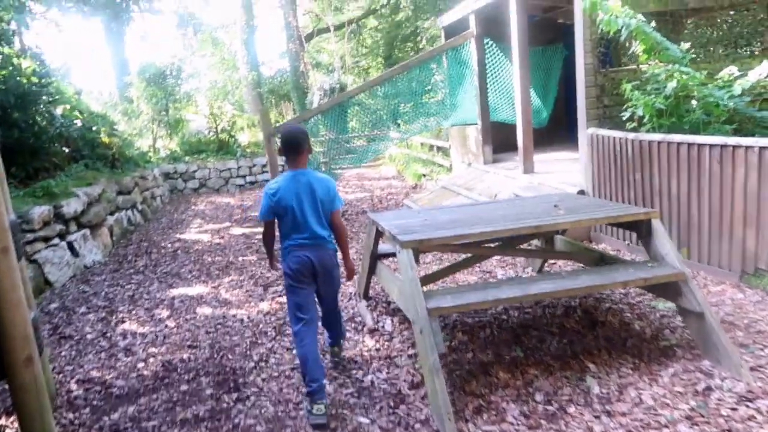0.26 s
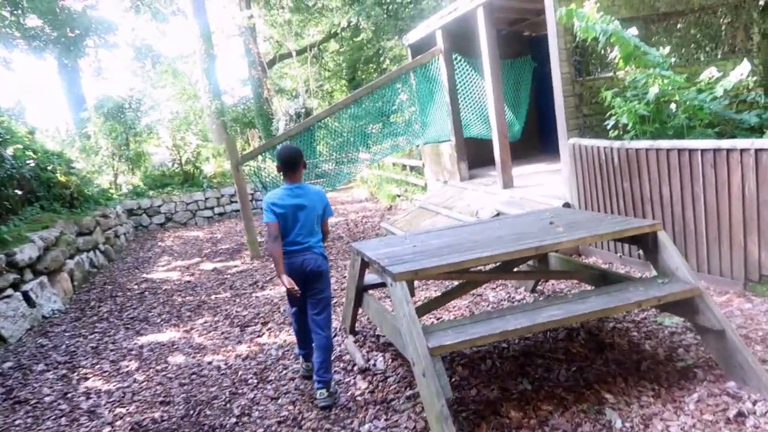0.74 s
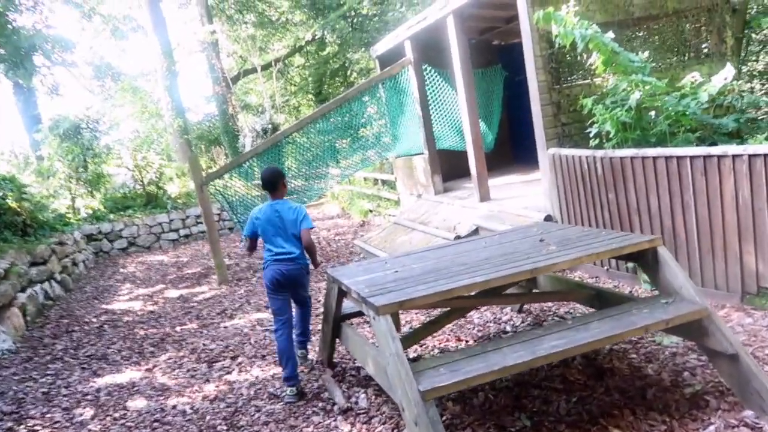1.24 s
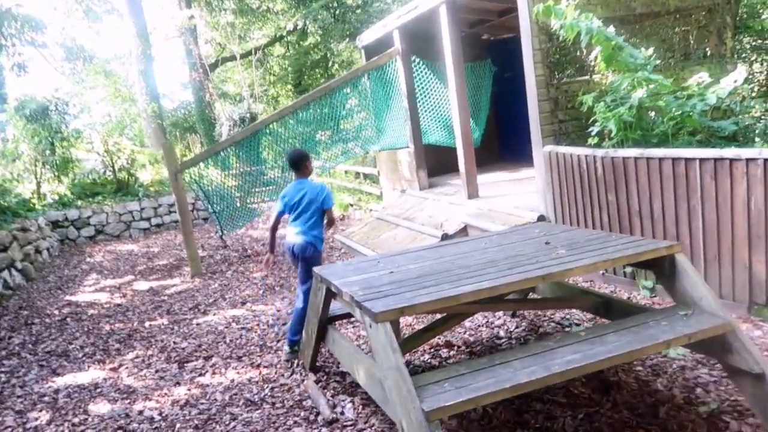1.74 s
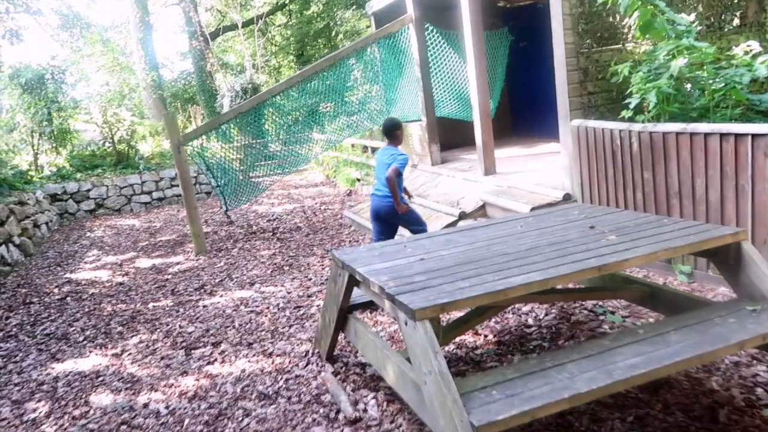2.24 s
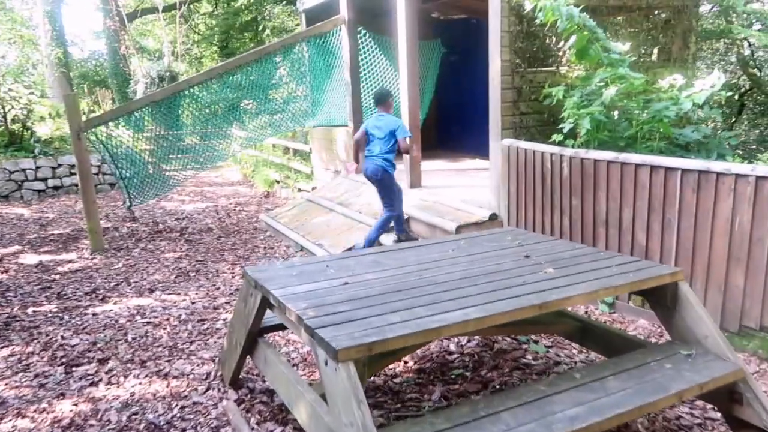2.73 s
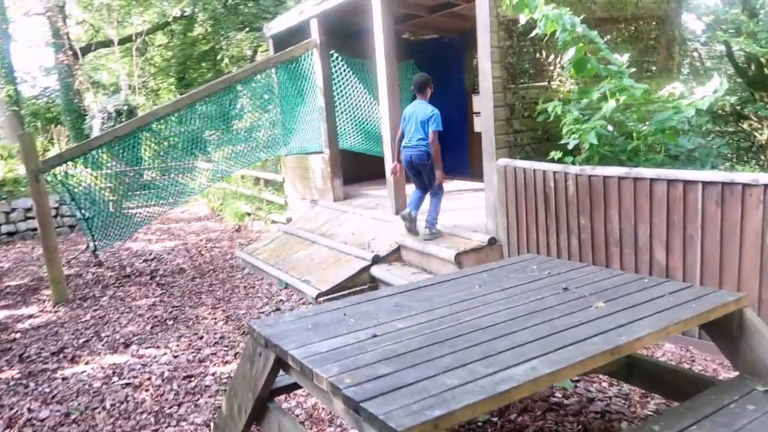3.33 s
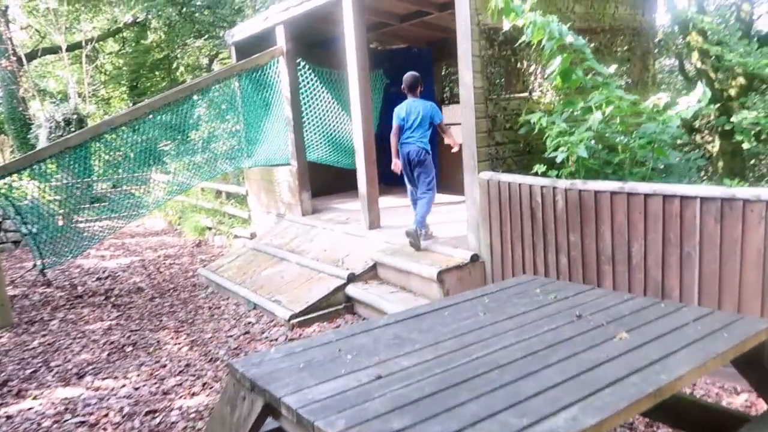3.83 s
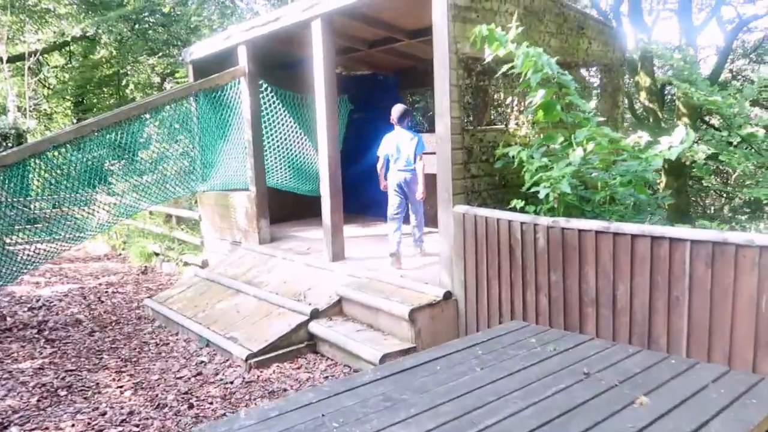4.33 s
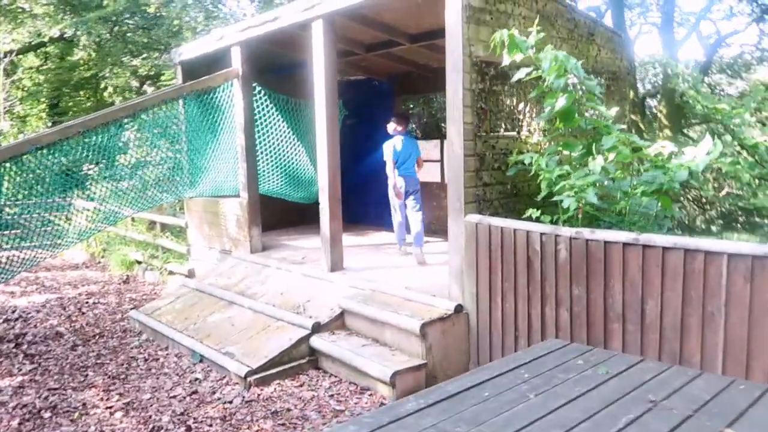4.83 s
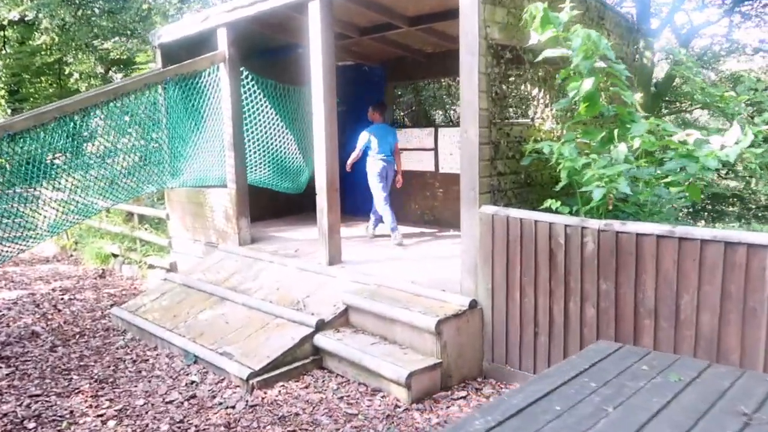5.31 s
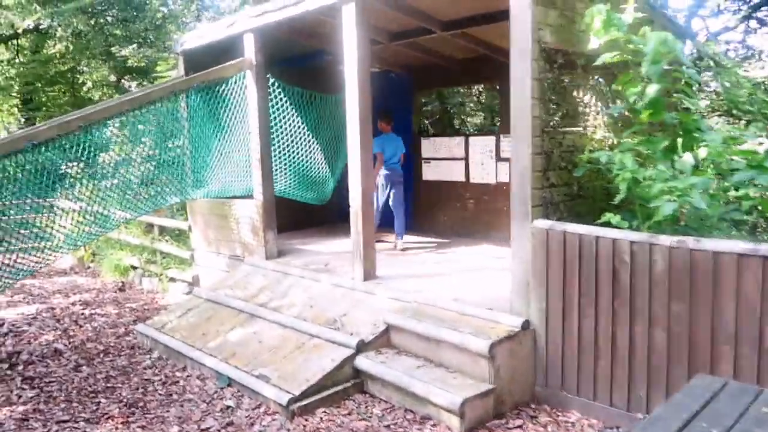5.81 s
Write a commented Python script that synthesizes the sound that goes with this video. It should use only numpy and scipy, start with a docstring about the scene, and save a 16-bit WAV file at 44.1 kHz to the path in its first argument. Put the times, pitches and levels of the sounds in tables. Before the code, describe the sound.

Crackly steps on bark and woody snaps, a loud booming knock halfway, a drier second clack, then gritty deck steps in light wind.

```python
"""A child's steps on bark chippings and then a gritty wooden deck: swells of tiny cracks, chip clicks, snaps.
Close on the hand-held camera, two sharp knocks ring casing and body modes; the first booms and overloads.
Faint thin treble ticks, like small glitches of the camera or microphone, are short noise bursts. Light wind on
the two ports rumbles as gusted noise and puffs as low pressure pulses, one of which is a knock's low push.
Behind it all, trees rush steadily: coloured noise with leaf hiss."""
import sys
import numpy as np
from scipy import signal
from scipy.fft import rfft, irfft, next_fast_len
from scipy.io import wavfile
from scipy.ndimage import uniform_filter1d, map_coordinates

SR = 44100
rng = np.random.default_rng(int(sys.argv[2]) if len(sys.argv) > 2 else 0)


def store_wav(level_fs):
    """Save 16-bit WAV to argv[1]."""
    pcm = np.round(np.clip(np.atleast_2d(level_fs), -1, 1) * 32767)
    wavfile.write(sys.argv[1], SR, pcm.T.astype(np.int16))


N = 267334

# In all tables the dB values are relative: each source adds its own trim or scales the colour.
# Footfalls and scuffs on bark, then deck: start_s, level_db, swell_length_s, centre_hz
FOOTFALLS = [(0.172, -34.5, 0.16, 780), (0.446, -31.5, 0.054, 760), (0.496, -28, 0.024, 895),
             (0.546, -36, 0.014, 1400), (0.963, -36.5, 0.079, 650), (1.029, -30.5, 0.038, 1050),
             (1.56, -32, 0.12, 537), (1.536, -41.5, 0.11, 5500), (1.602, -48, 0.073, 1700),
             (1.784, -35, 0.03, 1590), (1.789, -44, 0.035, 6600), (2.073, -26, 0.031, 780),
             (2.354, -39, 0.027, 700), (2.385, -32, 0.098, 664), (2.492, -23, 0.031, 720),
             (2.878, -30, 0.069, 1060), (3.04, -34, 0.05, 950), (3.149, -27.5, 0.032, 785),
             (4.125, -34, 0.051, 910), (4.375, -33.5, 0.06, 700), (4.721, -38, 0.098, 700),
             (4.776, -36, 0.11, 700), (4.89, -31.5, 0.085, 920), (5.191, -33.5, 0.082, 860),
             (5.465, -34, 0.063, 760), (5.552, -29.5, 0.014, 750), (5.644, -40, 0.045, 1100),
             (6.03, -30, 0.027, 1000)]
# Colour of a step centred on 1 kHz, moved to each step's centre: frequency_hz, density_db_per_hz
CRUNCH_COLOUR = [(150, -15), (450, 8.5), (1000, 10), (1700, 2), (2500, -12), (5000, -13), (12000, -45)]
# Single chips and boards that snap or clack: start_s, level_db, pitch_hz, length_cycles
WOOD_SNAPS = [(0.182, -12.5, 790, 5.3), (0.549, -16, 1600, 5), (0.604, -3.5, 490, 2.4),
              (0.969, -12.5, 427, 6), (1.007, -17, 900, 9), (1.0375, -8, 526, 6), (1.038, -9, 1540, 6),
              (1.0395, -17, 950, 10), (1.102, -17, 920, 7), (1.546, -15, 1340, 6.9), (1.546, -19, 6800, 9),
              (1.787, -19.5, 2620, 9), (1.787, -16, 420, 5), (1.9, -16, 2800, 4), (2.08, -14, 660, 5),
              (2.356, -19, 900, 6.2), (2.437, -19, 900, 7), (2.495, -19, 1100, 5), (2.519, -15, 950, 5.2),
              (2.897, -10, 840, 4.5), (2.936, -16, 950, 5.4), (3.111, -13, 830, 6.9), (3.132, -19, 1190, 5),
              (3.16, -14.5, 940, 7), (3.9328, -4.5, 1000, 5.3), (4.046, -15, 2160, 5.7),
              (4.374, -17, 700, 7), (4.899, -18, 790, 6.7), (4.959, -14, 1150, 6), (4.985, -19, 2500, 8.3),
              (5.467, -14.5, 1900, 6), (5.467, -14.5, 800, 6.7), (5.497, -9, 603, 9), (5.551, -16, 1100, 6),
              (5.65, -19, 1080, 6.4), (6.039, -14, 1280, 11), (6.043, -15, 705, 6.8)]
# Knocks and rebounds on the camera; the contact damps the click:
# start_s, click_db, favoured_pitch_hz, contact_t60_s, thud_db, rattle_db
CAMERA_KNOCKS = [(3.3021, 0.5, 3700, 0.055, -33, -31), (3.3049, 5.5, 950, 0.26, -1.5, -31),
                 (3.318, -25, 1200, 0.01, -12, -37), (3.3321, -13, 2000, 0.01, -16.5, -33),
                 (3.346, -28, 700, 0.01, -17, -40), (3.8752, 1, 2900, 0.0087, -46, -24),
                 (3.8762, -4.5, 650, 0.0076, -44, -21), (3.878, -9, 3400, 0.01, -25, -18.5),
                 (3.8996, -11, 3100, 0.012, -23, -27.5), (3.91, -24, 900, 0.008, -21, -29),
                 (3.9233, -27, 2900, 0.03, -29, -31)]
# Modes of the hard casing, which clicks at every contact: pitch_hz, level_db, t60_s
CASING_MODES = [(565, -1, 0.009), (820, 0.5, 0.036), (1150, -3.5, 0.028), (1370, -2, 0.02),
                (1890, -16, 0.011), (2680, -3.5, 0.017), (3020, -13, 0.0081), (3700, -2.5, 0.0069),
                (4400, -17, 0.0098), (4950, -38, 0.0074), (6200, -12, 0.0087)]
# Modes of the camera body and the hand that holds it: pitch_hz, level_db, t60_s
BODY_MODES = [(76, -4, 0.22), (122.6, -1.5, 0.19), (195, -4, 0.15), (249, -7.5, 0.21), (405, -17, 0.13),
              (500, -25, 0.15), (530, -29, 0.15), (663, -30, 0.12), (810, -34, 0.11), (1150, -39, 0.089),
              (1470, -31, 0.13), (2000, -32, 0.13)]
# Colour of dry crackle, in rattle and splintering: frequency_hz, density_db_per_hz
CRACKLE_COLOUR = [(60, -20), (300, 15.5), (1000, 4), (1800, 5), (2600, 6), (3350, 3), (4000, -2),
                  (4700, -5), (8000, -31), (12000, -41)]
# Faint thin treble ticks, like small glitches of the camera or microphone: start_s, level_db
THIN_TICKS = [(1.6085, -25), (2.310, -22), (2.4935, -19), (2.994, -24), (3.3115, -17), (3.378, -26),
              (3.878, -21), (4.38, -25), (4.563, -25), (5.131, -30), (5.397, -29), (5.447, -30),
              (5.514, -26)]
# Single low pressure pulses: wind puffs, and at 3.924 s the low push of the second knock:
# centre_s, level_db, pitch_hz, left_minus_right_db
PRESSURE_PULSES = [(0.212, -15, 85, 2), (0.226, -14.5, 95, 7), (0.903, -9, 151, -4), (0.933, -14, 75, 2),
                   (0.998, -0.5, 102, -3), (1.215, -11.5, 178, 5), (1.224, -2.5, 104, 3),
                   (1.402, -14, 191, 6), (1.414, -10.5, 100, 7), (1.514, -14, 96, -3), (1.538, -3, 68.6, 0),
                   (1.561, -11, 141, 18), (1.584, -6, 85.5, 12), (2.312, -22, 85, -2), (2.476, -15, 89, 0),
                   (2.545, -8, 135, 4), (2.892, -14.5, 123, 1), (2.937, -13, 100, 1.5), (2.996, -16, 85, 0),
                   (3.681, -14.5, 65.6, 1), (3.924, -21, 58, -7), (4.384, -14, 104, -5),
                   (4.678, -13, 85, 5), (4.936, -9.5, 92, 3), (4.98, -10, 92, -2.5), (4.991, -13, 102, -3),
                   (5.042, -12, 65.6, 0), (5.059, -9, 76, 2), (5.431, 0.5, 104, 2),
                   (5.481, -11.5, 90, -0.5), (5.524, -10.5, 109, -2)]
# Gusts on the microphone: start_s, length_s, buffet_db
WIND_GUSTS = [(0, 0.027, -34), (0.166, 0.055, -27.5), (0.62, 0.36, -34), (0.9, 0.17, -24.5),
              (1.353, 0.13, -26.5), (1.528, 0.084, -19.5), (1.664, 0.029, -26.5), (2.317, 0.027, -25),
              (2.478, 0.11, -21.5), (2.62, 0.43, -27.5), (2.863, 0.15, -26), (3.787, 0.027, -36),
              (3.933, 0.085, -36.5), (4.54, 0.037, -31), (4.66, 0.049, -28), (4.835, 0.094, -27),
              (4.975, 0.081, -22), (5.287, 0.077, -24.5), (5.447, 0.11, -23)]
# Colour of wind on the ports: frequency_hz, density_db_per_hz
RUMBLE_COLOUR = [(12, -16), (25, -4.5), (45, 6), (75, 3), (115, -3.5), (170, -9.5), (260, -20.5),
                 (450, -30), (1200, -65)]
# Slow level curves of the trees: time_s, low_rush_db, leaf_hiss_db
TREE_LEVELS = [(0.0, -30, -40), (2.45, -31, -40), (3.24, -30.5, -41), (3.43, -31.5, -42),
               (4.42, -33, -42.5), (4.84, -31.5, -41.5), (6.06, -31.5, -41.5)]
# Colour of the trees: frequency_hz, density_db_per_hz
RUSH_COLOUR = [(35, -50), (60, -31), (108, -2.5), (168, -5), (244, -2.5), (274, -4), (371, -5.5),
               (408, -8.5), (566, -9.5), (732, -11), (968, -13.5), (1440, -18), (3340, -28.5), (10000, -46),
               (16000, -74.5)]
# Stereo width at the close ports: frequency_hz, side_gain_db
PORT_WIDTH = [(60, -56), (200, -23), (330, -11.5), (600, -15), (1300, -14), (2400, -11.5), (4400, -3),
              (8100, 1), (12000, 12.5), (15000, 18)]

GUST_RISE_S, GUST_FALL_S = 0.024, 0.025  # time constants of every gust
SAG_DB_PER_S = 6  # a gust eases while it lasts
CALM_DB, CALM_SWING_DB = -40.5, 4.5  # the restless air between gusts, before the wind trim
STIFFEN, RELAX_S = 0.42, 0.018  # a blow tightens the grip: fractional rise of the lowest mode, time to relax
TOP_HZ = 16100  # band limit of the input


def amp(db):
    """Decibels to gain."""
    return 10 ** (np.asarray(db) / 20)


def unit(x):
    """Scale to rms 1."""
    return x / np.sqrt(np.mean(x ** 2) + 1e-20)


def along(points, hz):
    """Interpolate (Hz, value) points on a log frequency axis."""
    f, v = np.transpose(points)
    return np.interp(np.log(hz + 1), np.log(f + 1), v)


def curves(rows):
    """One value per sample for each column after the time."""
    s, *cols = np.transpose(rows)
    return [np.interp(np.arange(N) / SR, s, c) for c in cols]


def wobble(rate):
    """A smooth random curve, rate knots a second."""
    knots = rng.standard_normal(int(N * rate / SR) + 4)
    return map_coordinates(knots, [np.arange(N) * rate / SR])


def filtered(x, response):
    """Filter x by a real or complex response of frequency."""
    n = x.shape[-1]
    m = next_fast_len(n + SR // 4)
    return irfft(rfft(x, m) * response(np.fft.rfftfreq(m, 1 / SR)), m)[..., :n]


def resonance(f, hz, width):
    """Causal response of one resonance, with its width in Hz."""
    return 1j * f * width / (hz * hz - f * f + 1j * f * width)


def noise(spectrum, size):
    """Two unrelated noises of the given colour, scaled together to rms 1."""
    return unit(filtered(rng.standard_normal((2, size)), lambda f: amp(along(spectrum, f))))


def ring(t, hz, t60):
    """One damped mode, a sine that falls 60 dB in t60 seconds."""
    return np.sin(2 * np.pi * hz * t) * amp(-60 * t / t60)


def cracks(per_s, size, spread_db=4):
    """Two trains of tiny random cracks, a few much larger than the rest, rms 1."""
    signs = rng.choice([-1, 1], (2, size))
    present = rng.random((2, size)) < per_s / SR
    return unit(present * signs * amp(spread_db * rng.standard_normal((2, size))))


def patchy(x, depth_db):
    """Let each band swell and fade on its own, in patches of a few hundred Hz and a tenth of a second."""
    spectra = signal.stft(x, nperseg=512)[2]
    field = rng.standard_normal(spectra.shape[1:])
    field = uniform_filter1d(field, size=3, axis=0)  # across frequency
    field = uniform_filter1d(field, size=16, axis=1)  # across time
    return unit(signal.istft(spectra * amp(depth_db * unit(field)))[1][:, :N])


def add(track, s, sound):
    """Mix a sound in at time s."""
    part = track[..., max(round(s * SR), 0):][..., :sound.shape[-1]]
    part += sound[..., :part.shape[-1]]


def ports(pair, side_db=0):
    """Mid and side to left and right: the close ports agree in the bass and part in the treble."""
    mid = pair[0]
    side = filtered(pair[1], lambda f: amp(along(PORT_WIDTH, f) + side_db))
    return np.array([mid + side, mid - side])


def steps(level_db=1.8, grains_per_s=650, scuff=0.46, heel=0.66):
    """A sole presses many chips at once: a swell of tiny cracks in a broad woody band."""
    out, t = np.zeros((2, N)), np.arange(SR // 3) / SR
    for s, db, length, hz in FOOTFALLS:
        grit = cracks(grains_per_s, len(t), spread_db=3.5) + scuff * rng.standard_normal((2, len(t)))
        crunch = unit(filtered(grit, lambda f: amp(along(CRUNCH_COLOUR, f * 1000 / hz))))
        load = heel + 3 * t / length  # the heel lands with part of the load at once
        add(out, s, amp(db + level_db) * crunch * load * np.exp(1 - load))
    return ports(out, side_db=-16)


def chips(level_db=1.0, count=10, scatter_s=0.035, spread_db=3, pitch_spread=0.31, cycles=6, pitch=1.42):
    """Every footfall flicks a few loose chips that click after it, each with its own size and pitch."""
    out, t = np.zeros((2, N)), np.arange(SR // 40) / SR
    for s, db, length, hz in FOOTFALLS:
        for when, size, tone, place in rng.standard_normal((count, 4)):
            f = min(pitch * hz * np.exp(pitch_spread * tone), SR / 4)
            chip = ring(t, f, cycles / f) * np.array([[1], [place / 4]])  # mid, side
            delay = abs(when) * (length / 2 + scatter_s)
            chip_db = db + level_db + spread_db * np.clip(size, -2, 1)
            add(out, s + delay, amp(chip_db) * chip)
    return ports(out)


def snaps(level_db=-3, splinter=0.18, soften=3, swell=0.086):
    """A short woody ring that swells and dies, with a splintering edge; little reaches far above its pitch."""
    out, t = np.zeros((2, N)), np.arange(SR // 10) / SR
    for s, db, hz, cycles in WOOD_SNAPS:
        length = cycles / hz
        u = t / (swell * length)
        wood = np.sin(2 * np.pi * hz * t) * u * np.exp(1 - u)
        edge = splinter * noise(CRACKLE_COLOUR, len(t)) * amp(-60 * t / length)
        snap = filtered(wood + edge, lambda f: 1 / (1 + 1j * f / (soften * hz)) ** 2)
        add(out, s, amp(db + level_db) * snap)
    return ports(out, side_db=-26)


def knocks(focus=0.73, rattle_t60=0.18, rattle_per_s=1100, clump_db=5.0, boom_db=4.0,
           rough_db=-11.0, rough_t60=0.33, soften_hz=7500):
    """The casing clicks, the body booms and loose parts rattle in bursts; both ports feel the boom alike."""
    clicks, boom, t = np.zeros((2, N)), np.zeros(N), np.arange(SR // 2) / SR
    gripped = t + STIFFEN * RELAX_S * (1 - np.exp(-t / RELAX_S))  # time runs fast while the grip is stiff
    for s, click_db, hz, contact_t60, thud_db, rattle_db in CAMERA_KNOCKS:
        # click and rattle are strongest near the pitch of the part that was hit
        shell = sum(amp(db) * abs(resonance(f, hz, focus * hz)) * ring(t, f, t60)
                    for f, db, t60 in CASING_MODES)
        click = shell * amp(click_db - 60 * t / contact_t60) * amp([[0], [-9]])  # mid, side
        bursts = cracks(rattle_per_s, len(t)) * amp(clump_db * wobble(204)[:len(t)])
        rattle = unit(filtered(bursts, lambda f: amp(along(CRACKLE_COLOUR, f)) * resonance(f, hz, 3.0 * hz)))
        add(clicks, s, click + rattle * amp(rattle_db - 60 * t / rattle_t60))
        # each blow excites the body modes a little differently; only the lowest feels the grip
        modes = sum(amp(db + rng.normal(0, 1)) * ring(t if k else gripped, f, t60)
                    for k, (f, db, t60) in enumerate(BODY_MODES))
        shudder = unit(filtered(rng.standard_normal(len(t)), lambda f: resonance(f, 193, 580) ** 2))
        shudder = shudder * amp(rough_db - 60 * t / rough_t60)
        add(boom, s, amp(thud_db + boom_db) * (modes + shudder))
    boom = filtered(boom, lambda f: (1j * f / (30 + 1j * f)) ** 2)  # a light body carries no deep push
    both = ports(clicks, side_db=-6.0) + boom
    return filtered(both, lambda f: 1 / (1 + 1j * f / soften_hz) ** 2)


def ticks(level_db=1, low_hz=2500, high_hz=11000, t60=0.0027):
    """Faint thin treble ticks, like small glitches: dry, decaying noise bursts, alike on both ports."""
    out, t = np.zeros(N), np.arange(SR // 100) / SR
    for s, db in THIN_TICKS:
        burst = rng.standard_normal(len(t)) * amp(-60 * t / t60)
        tick = filtered(burst, lambda f: (1j * f / (low_hz + 1j * f)) ** 2)
        add(out, s, amp(db + level_db) * tick / np.abs(tick).max())
    return filtered(out, lambda f: 1 / (1 + 1j * f / high_hz))


def pressure_pulses(level_db=-1, skew=0.23, churn=0.065, suck=0.36):
    """Each pulse is a push and a suck after it, offset in time between the ports, with churning noise on each."""
    out, t = np.zeros((2, N)), np.arange(SR // 10) / SR - .05  # time around the pulse's centre
    sides = np.array([[1], [-1]])  # left, right
    for s, db, hz, pan in PRESSURE_PULSES:
        u = np.pi * hz * t + sides * skew * np.tanh(pan / 2)
        swirl = filtered(rng.standard_normal((2, len(t))), lambda f: resonance(f, 271, 98) ** 2)
        push = (1 - 2 * u * u - 2 * suck * u) * np.exp(-u * u)
        pulse = push + churn * unit(swirl) * np.exp(-np.abs(u) / 2) * 2
        add(out, s + t[0], amp(db + level_db + sides * pan / 2) * pulse)
    return out


def gusts():
    """Strength of the wind: every gust swells, sags and dies away alike, over restless calm air."""
    t = np.arange(N) / SR
    power = amp(CALM_DB + CALM_SWING_DB * wobble(10)) ** 2
    for s, length, db in WIND_GUSTS:
        edges = np.exp(np.minimum(t - s, 0) / GUST_RISE_S - np.maximum(t - s - length, 0) / GUST_FALL_S)
        sagging_db = db - SAG_DB_PER_S * np.clip(t - s, 0, length)
        power = power + (amp(sagging_db) * edges) ** 2
    return np.sqrt(power)


def wind(level_db=1.5, gust_db=-25, calm_side_db=-16, parting=0.68, lump_db=3.5):
    """Turbulence on the ports: the stronger the gust, the less the two agree on its small eddies."""
    buffet_db = 20 * np.log10(gusts())
    mid, side = noise(RUMBLE_COLOUR, N)
    # even out the swings over 50 ms, so that gusts and lumps set the size
    mid = mid / np.sqrt(np.abs(uniform_filter1d(mid ** 2, size=2200)) + 0.035)
    side = filtered(side, lambda f: resonance(f, 175, 220) ** 2)
    side = unit(side) * amp(np.clip(-9.0 + parting * (buffet_db - gust_db), calm_side_db, 0))
    strength = amp(buffet_db + level_db + lump_db * wobble(25.04))
    return strength * np.array([mid + side, mid - side])


def trees(low_db=0.08, hiss_db=1, split_hz=2100, flutter_db=1.0):
    """A broad outdoor rush, with fluttering leaf hiss on top."""
    rush_db, leaf_db = curves(TREE_LEVELS)
    air = patchy(noise(RUSH_COLOUR, N), depth_db=1.4)
    low = filtered(air, lambda f: 1 / (1 + (f / split_hz) ** 4))
    rush = unit(low) * amp(rush_db + low_db + flutter_db * wobble(8.2))
    leaves = unit(air - low) * amp(leaf_db + hiss_db + flutter_db * wobble(13))
    return ports(rush + leaves)


def scene():
    """Everything that reaches the two channels, from the steps to the trees."""
    return steps() + chips() + snaps() + knocks() + ticks() + pressure_pulses() + wind() + trees()


def record(dry):
    """The input overloads near full scale, with a dull edge, and keeps nothing above its band limit."""
    excess = dry - .95 * dry / (1 + np.abs(dry) ** 6) ** (1 / 6)
    clipped = dry - filtered(excess, lambda f: 1 / (1 + (f / 7000) ** 4))
    return filtered(clipped, lambda f: f < TOP_HZ)


dry = scene()
out = record(dry)
store_wav(out)
```